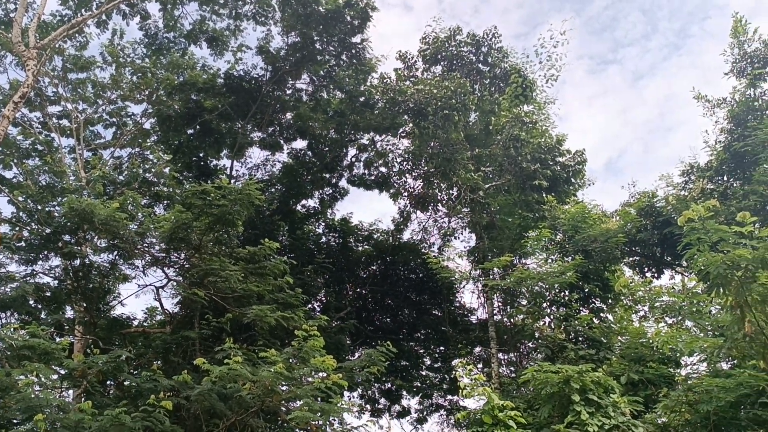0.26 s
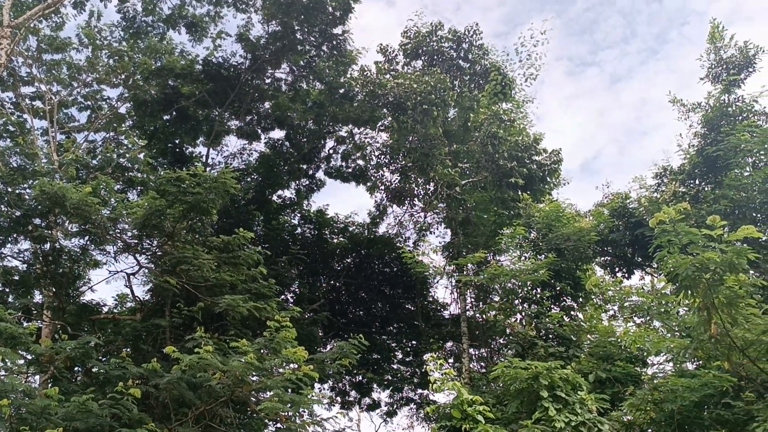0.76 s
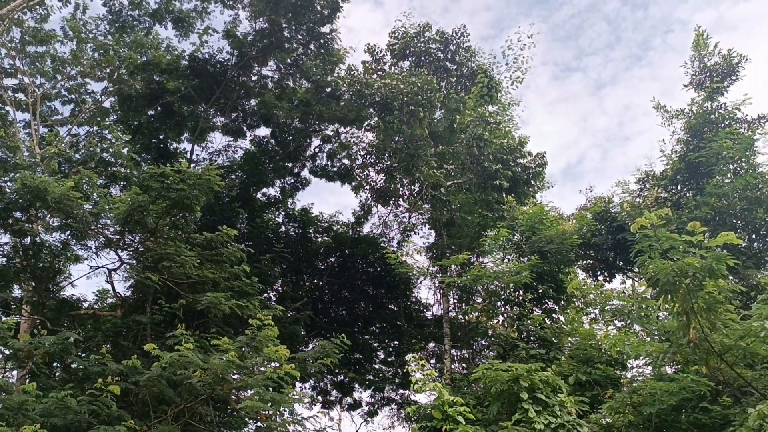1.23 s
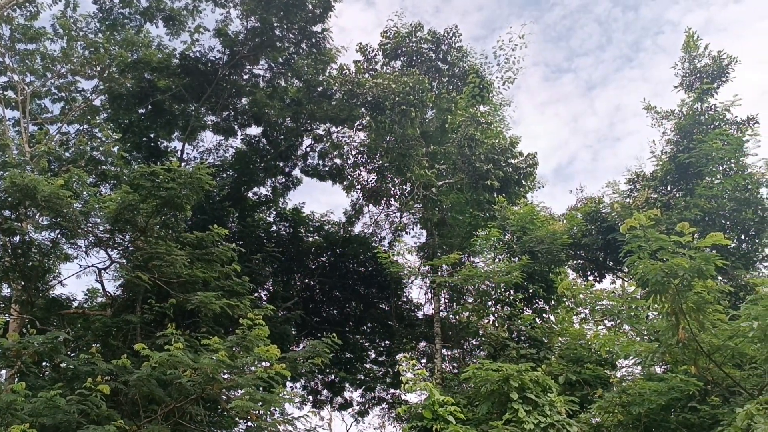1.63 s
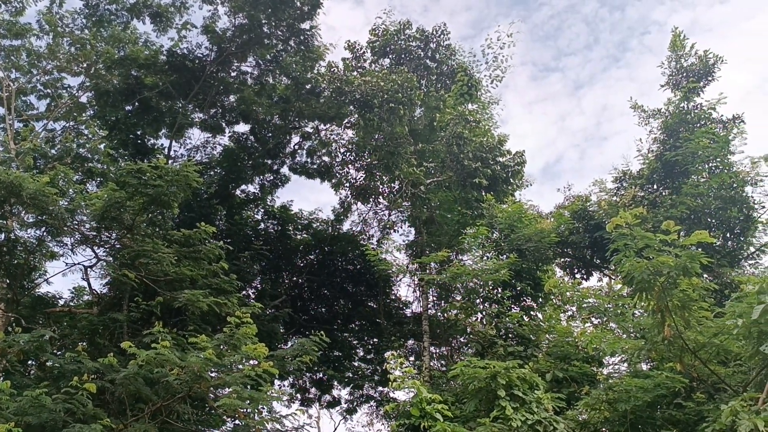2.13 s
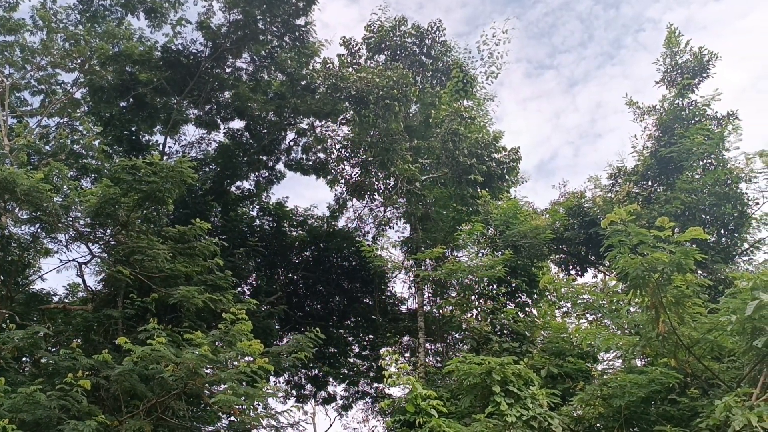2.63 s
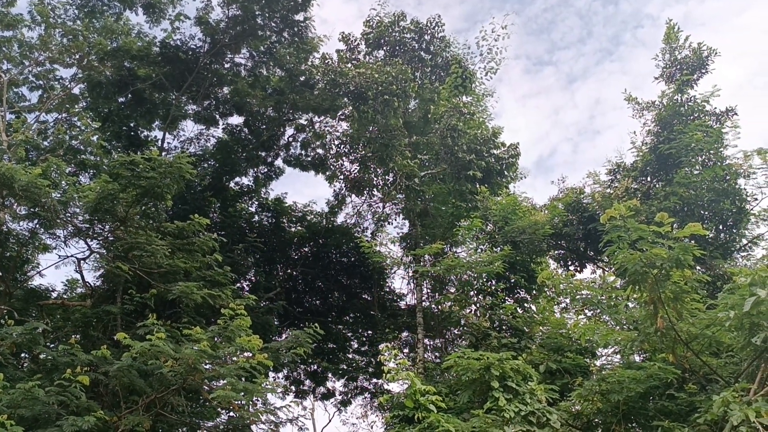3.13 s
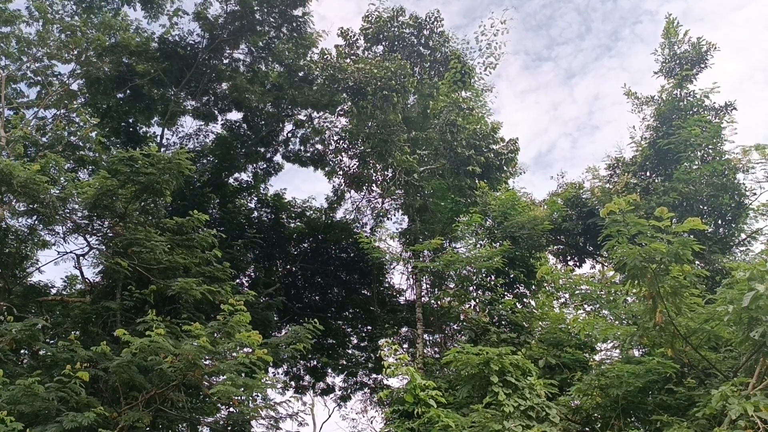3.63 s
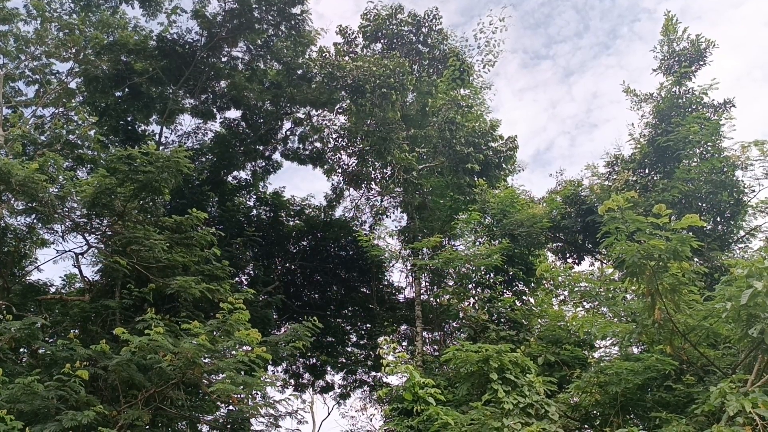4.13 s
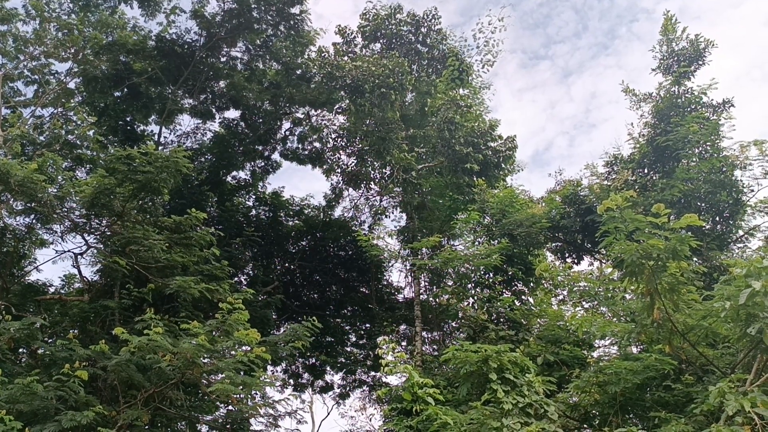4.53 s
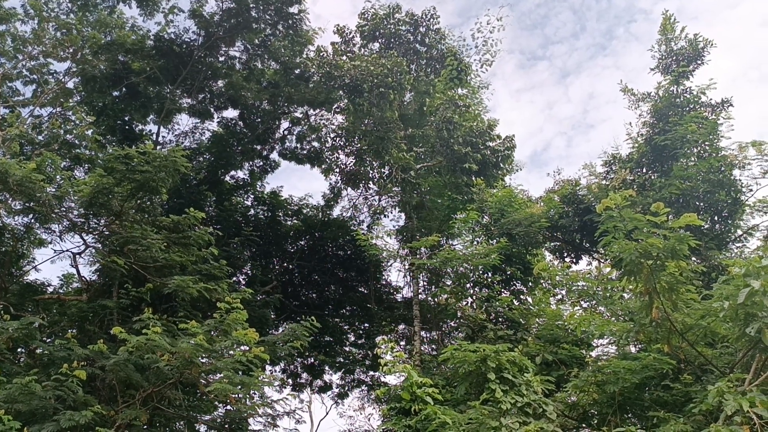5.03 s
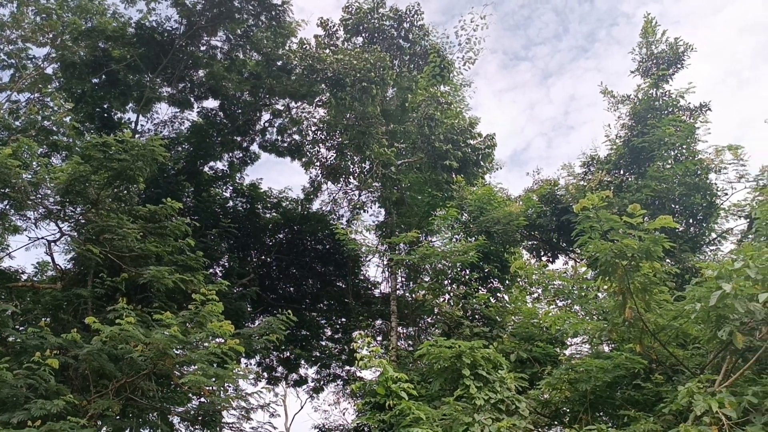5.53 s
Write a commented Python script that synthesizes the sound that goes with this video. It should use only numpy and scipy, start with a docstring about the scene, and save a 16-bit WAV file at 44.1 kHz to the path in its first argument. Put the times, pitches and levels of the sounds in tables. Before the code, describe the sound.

A high, ringing cicada drone runs throughout, toward the right, while smaller insects hiss faintly in waves on the left above a soft forest hush and low rumble. At about 0.4 seconds a large bird in the canopy starts giving short, harsh, raspy calls, two or three a second, quiet at first and steadily louder. From 1.5 seconds quick clucks fall between them, and some notes turn briefly clear or break in pitch. The calling is loudest from about 2 to 4 seconds, ending in higher clucks. A second, higher bird adds two squeals at about 3.7 and 4.1 seconds. The trees scatter the calls into a short echo. From 4.5 to 5.7 seconds a third bird gives four faint, harsh calls far away. Three very soft, dull bumps occur at about 0.4, 5.2 and 5.6 seconds.

```python
"""A chachalaca calls from the forest canopy in harsh phrases that grow louder, some notes turning clear.
Its syrinx is a harmonic source, chopped into puffs when pressed and filtered by throat and beak.
A second, higher bird joins the last phrase, then a third calls far off; the trees scatter the calls back.
Cicadas drone with ringing tymbals on the right and smaller insects hiss in waves on the left,
over a faint low rumble and three soft bumps."""
import sys
import numpy as np
from scipy import signal
from scipy.fft import rfft, irfft, next_fast_len
from scipy.io import wavfile
from scipy.ndimage import uniform_filter1d

SR = 44100
rng = np.random.default_rng(int(sys.argv[2]) if len(sys.argv) > 2 else 0)


def master(y):
    """Save y as 16-bit WAV."""
    cut = np.clip(np.atleast_2d(y).T, -1, 1)
    pcm = np.round(cut * 32767)  # scale
    wavfile.write(sys.argv[1], SR, pcm.astype(np.int16))


N = 254016
TIME = np.arange(N) / SR

# throat resonances of the near and the far bird: f/Hz, level/dB
THROAT_RESONANCES = [(130, -69), (280, -18), (520, -15), (610, -11), (780, -2.5), (900, -8), (1090, 6),
                     (1260, -2.5), (1430, -6.5), (1750, -28), (2500, -37)]
# spectral envelope of their overtones: f/Hz, level/dB
OVERTONE_ENVELOPE = [(1600, -3.5), (1870, -2.5), (1990, 2.5), (2170, 1.5), (2330, -11), (2480, 7),
                     (2730, 9), (3050, -1), (3650, -4), (4130, -5), (5000, -10), (6500, -21), (8500, -34),
                     (14000, -42)]


def gain_of(db):
    """Amplitude ratio of a level in decibels."""
    return 10 ** (np.asarray(db) / 20)


def unit_rms(x):
    """Normalisation to a mean power of 1."""
    return x / np.sqrt(np.mean(x ** 2) + 1e-20)


def value_at(points, hz):
    """Interpolation on a logarithmic frequency axis."""
    f, value = np.transpose(points)
    return np.interp(np.log(hz + 1), np.log(f + 1), value)


def band_gain(points, hz):
    """Band-pass response: beyond its ends the spectrum falls by 50 dB per octave."""
    octaves_below = np.maximum(np.log2(points[0][0] / (hz + 1)), 0)
    octaves_above = np.maximum(np.log2((hz + 1) / points[-1][0]), 0)
    return gain_of(value_at(points, hz) - 50 * (octaves_below + octaves_above))


def coloured(x, points):
    """Linear filtering by multiplication of spectra; the result has rms 1."""
    n = next_fast_len(x.shape[-1])
    response = band_gain(points, np.fft.rfftfreq(n, 1 / SR))
    return unit_rms(irfft(rfft(x, n) * response, n)[..., :x.shape[-1]])


def wander(n, hz):
    """Random modulation: up to a second of noise, low-passed near hz, with rms about 1."""
    low_pass = np.exp(-(np.arange(SR // 2 + 1) / hz) ** 2)
    return unit_rms(irfft(rfft(rng.standard_normal(SR)) * low_pass, SR))[:n]


def levelled(x, window=700):
    """Division by the short-time rms steadies the level but keeps faster pulses."""
    return x / np.sqrt(uniform_filter1d(uniform_filter1d(x ** 2, window), window) + 1e-9)


def add(mix, start, sound):
    """Superposition of a sound from a start time in seconds."""
    part = mix[round(start * SR):][:len(sound)]
    part += sound[:len(part)]


def placed(x, left_db, left_lead=0):
    """Interaural differences: one of level, and one of time in samples."""
    left, right = x * gain_of([[left_db / 2], [-left_db / 2]])
    return np.array([np.roll(left, -left_lead), right])


def noise_pair(correlation):
    """Partial correlation: two channels of white noise share a component."""
    a, b = rng.standard_normal((2, N))
    return np.array([a, correlation * a + np.sqrt(1 - correlation ** 2) * b])


def background(db=-51):
    """Distant rumble and diffuse forest hush: coherence between the ears falls with frequency."""
    # spectral density of the hush: f/Hz, level/dB
    hush_spectrum = [(20, -34), (45, -15.5), (65, -1.5), (85, -3.5), (108, 4), (150, -5), (300, -8.5),
                     (600, -14), (900, -16), (1150, -15), (1700, -16.5), (2700, -11.5), (3300, -11),
                     (4300, -8.5), (7200, -15), (8300, -31), (16000, -47)]
    hz = np.fft.rfftfreq(N, 1 / SR)
    coherence = value_at([(100, 0.59), (500, 0.17), (2000, 0.025)], hz)
    left_db = value_at([(600, 1.5), (1200, -1.5), (4200, -6.5), (7000, 5.5), (9000, -6.5)], hz)
    left, independent = rfft(rng.standard_normal((2, N)))
    right = coherence * left + np.sqrt(1 - coherence ** 2) * independent
    pair = irfft(np.array([left * gain_of(left_db / 2), right * gain_of(-left_db / 2)]), N)
    return gain_of(db) * coloured(pair, hush_spectrum)


def bumps():
    """Damped oscillation: each dull knock is a sine and a noisy scuff that die away together."""
    # soft knocks: t/s, level/dB, f/Hz, decay time/s
    knocks = [(0.352, -60.5, 590, 0.0044), (5.223, -54.5, 213, 0.0057), (5.558, -48.5, 107, 0.0068)]
    track, t = np.zeros(N), np.arange(SR // 4) / SR
    for start, db, hz, decay in knocks:
        scuff = coloured(rng.standard_normal(len(t)), [(hz / 2, -8), (hz, 0), (hz * 2, -6), (hz * 6, -22)])
        envelope = gain_of(db) * t / decay * np.exp(1 - t / decay)
        add(track, start, envelope * (np.sin(2 * np.pi * hz * t) + scuff))
    return track


def insect_swell_db(build_s=0.35, stop_s=0.077, rest_db=-64.5):
    """Incoherent sources add in power: waves build slowly and stop quickly over a resting level."""
    # crests of the waves: t/s, relative level/dB
    crests = [(0.328, -58), (1.02, -63), (1.8, -60), (2.34, -63), (2.6, -58.5), (2.95, -63), (3.349, -56.5),
              (3.75, -58), (4.2, -59), (4.48, -65), (4.98, -61), (5.2, -63), (5.76, -65)]
    waves = [gain_of(db) * np.exp(np.minimum((TIME - s) / build_s, (s - TIME) / stop_s)) for s, db in crests]
    return 10 * np.log10(gain_of(rest_db) ** 2 + sum(wave ** 2 for wave in waves))


def small_insects(flicker_hz=70, flicker_db=2.5):
    """Band-limited noise: a steady hiss, waves of hiss with a fast, uneven flicker, and a thin whine."""
    # spectral density of the steady hiss: f/Hz, level/dB
    hiss_spectrum = [(7500, -23), (9300, -15), (10200, -6.5), (11000, 1.5), (11700, -6.5), (12300, -11),
                     (13500, -20), (15000, -19), (15700, -7.5)]
    # spectral density of the waves: f/Hz, level/dB
    wave_spectrum = [(10500, -9), (11500, -9.5), (12200, -1), (13300, -7), (14500, -3), (15700, -6)]
    # envelope of the whine: t/s, relative level/dB
    whine_envelope = [(0, -70.5), (1.25, -61.5), (1.8, -73), (2.7, -67), (3.3, -82), (5.76, -83)]
    hiss = coloured(noise_pair(0.24), hiss_spectrum) * gain_of(-68)
    flicker_rate = flicker_hz * (1 + .3 * np.resize(wander(SR, 30.5), N))
    flicker = np.sin(2 * np.pi * np.cumsum(flicker_rate) / SR)
    waves = coloured(noise_pair(.3), wave_spectrum) * gain_of(insect_swell_db() + flicker_db * flicker - 3)
    whine = coloured(noise_pair(0.19), [(10600, -30), (11150, -8), (11700, -29)])
    whine *= gain_of(np.interp(TIME, *np.transpose(whine_envelope)) - 1)
    return placed(hiss + waves, left_db=16) + placed(whine, left_db=10)


def cicadas(db=-36, tymbal_hz=104, depth=0.11):
    """Tymbal resonance: a chorus merges into a noise band, modulated by the nearest one's steady beat."""
    # spectral density of the chorus: f/Hz, level/dB
    tymbal_spectrum = [(3000, -57), (4400, -35.5), (4700, -21.5), (4950, -10), (5150, -11.5), (5330, 0),
                       (5450, 2.5), (5620, 1.5), (5800, -9), (6000, -12.5), (6250, -16), (6550, -31.5),
                       (7300, -30), (8200, -91)]
    phase = 2 * np.pi * tymbal_hz * TIME
    beat = 1 + depth * np.array([[.5], [1]]) * (np.cos(phase) + 0.43 * np.cos(2 * phase))
    chorus = coloured(noise_pair(.3), tymbal_spectrum)
    return placed(gain_of(db) * unit_rms(chorus * beat), left_db=-7, left_lead=22)


def forest_echo(x, early_db, early_s, echoes_per_s=2500):
    """Scattering: near foliage returns a quick cloud of echoes, far trunks a long tail."""
    # reverberation of the forest: f/Hz, reverberation time/s
    reverberation_times = [(300, 1), (700, 0.88), (1100, 0.86), (2700, 0.79), (5000, 0.83), (12000, 0.43)]
    t = np.arange(SR) / SR
    echoes = rng.standard_normal((2, SR)) * (rng.random((2, SR)) < echoes_per_s / SR)
    echoes *= (t > .004) * (1 + gain_of(early_db) * np.exp(-t / early_s))
    hz, delay, spectra = signal.stft(echoes, SR, nperseg=256)
    decay = gain_of(-60 * delay / value_at(reverberation_times, hz)[:, None])
    response = signal.istft(spectra * decay, SR, nperseg=256)[1]
    response /= np.linalg.norm(response, axis=1, keepdims=True)
    return signal.fftconvolve(x[None], response, axes=1)[:, :N]


def syrinx(controls, throat, overtones, rattle_hz=140, jitter=0.0513, rasp=.65, airiness=.06):
    """Source and filter: the syrinx sings harmonics; pressed, it rattles and chops them into puffs."""
    times, *curves = np.broadcast_arrays(*controls)
    t = np.arange(times[0], times[-1], 1 / SR)
    effort_db, hz, rough, bright_db, gape = (np.interp(t, times, curve) for curve in curves)
    n, rough = len(t), np.clip(rough, 0, 1)
    cycles = np.cumsum(hz * (1 + (0.0011 + jitter * rough) * wander(n, 226))) / SR
    rattle_phase = np.cumsum(rattle_hz * (1 + 0.1817 * wander(n, 71.3))) / SR % 1
    pulses = np.exp(-rattle_phase / 0.33) - np.exp(-rattle_phase / 0.088) + 0.15
    puffs = unit_rms(pulses * gain_of(1.75 * wander(n, 94)))
    harmonics = [(k * hz, np.cos(2 * np.pi * (k * cycles + rng.random()))) for k in range(1, 25)]

    def resonate(spectrum, shift, noise_share, sharpness):
        """Tone and air noise pass resonances whose frequencies slide by the factor shift."""
        tone = levelled(sum(band_gain(spectrum, f / shift) ** sharpness * wave for f, wave in harmonics))
        air = np.interp(np.cumsum(shift), np.arange(SR), coloured(rng.standard_normal(SR), spectrum))
        blend = np.sqrt(1 - noise_share) * tone + np.sqrt(noise_share) * air
        return levelled(blend * (1 - rough + rough * puffs))

    # a half-shut beak blunts the resonances; a clear note locks onto the strongest one
    blunted = [(f, db * min(gape.mean(), 1) ** 2) for f, db in throat]
    noise_share = rasp * rough ** 2
    low = resonate(blunted, gape, noise_share, sharpness=1 + 0.97 * (1 - rough) ** 2)
    high = resonate(overtones, np.maximum(gape, 1) ** .6, airiness + noise_share, sharpness=1)
    envelope = gain_of(effort_db) * signal.windows.tukey(n, .04)
    return envelope * low, envelope * gain_of(bright_db) * high


def voice(notes, throat, overtones):
    """Superposition of one bird's notes on two tracks: throat tone and overtones."""
    tracks = np.zeros((2, N))
    for controls in notes:
        for track, sound in zip(tracks, syrinx(controls, throat, overtones)):
            add(track, controls[0][0], sound)
    return tracks


def far_call(start, length, effort_db, hz, rough=0.8, bright_db=-11):
    """Joint modulation: the level and pitch of a harsh note rise and fall together."""
    u = np.linspace(0, 1, 100)
    ends = (2 * u - 1) ** 2
    return start + u * length, effort_db - 11 * ends, hz * (1 - 0.0405 * ends), rough, bright_db, 1


def far_bird(distance_db=-40):
    """Reverberant field: only scattered sound arrives from a chachalaca deep in the trees."""
    # distant calls: t/s, length/s, relative level/dB, f/Hz
    calls = [(4.551, 0.28, -36, 381), (5.079, 0.19, -27, 377), (5.329, 0.133, -20, 390),
             (5.569, 0.17, -21.5, 397)]
    song = voice([far_call(*row) for row in calls], THROAT_RESONANCES, OVERTONE_ENVELOPE).sum(0)
    return placed(gain_of(distance_db) * forest_echo(song, early_db=14, early_s=0.027), left_db=-3)


def squeal(start, length, effort_db, hz, crest, rough, bright_db):
    """Frequency modulation: a nearly clear, level note on one arch of pitch, brightest at the top."""
    u = np.linspace(0, 1, 100)
    effort = effort_db - 11.5 * abs(2 * u - 1) ** 6
    pitch = hz * (1 - .5 * (u - crest) ** 2)
    brightness = bright_db - 24 * (2 * (u - crest)) ** 2
    return start + u * length, effort, pitch, rough, brightness, 1


def answering_bird():
    """Source and filter: a second bird squeals through higher throat resonances."""
    # squeals: t/s, length/s, relative level/dB, top f/Hz, crest/length, roughness, brightness/dB
    squeals = [(3.653, .24, -39, 561, .62, 0.18, -4), (4.053, .099, -31.5, 551.2, .4, 0.23, -5)]
    # throat resonances: f/Hz, level/dB
    throat = [(200, -48), (540, -5.5), (800, -27), (1100, 1.5), (1350, 5.5), (1650, -0.5), (1900, -5.5)]
    # spectral envelope of the overtones: f/Hz, level/dB
    overtones = [(1700, -24), (2200, -9.5), (2750, -9), (3300, 1.5), (3800, -30), (4400, -5.5), (6000, -24),
                 (12000, -42)]
    return voice([squeal(*row) for row in squeals], throat, overtones)


def cluck(start, length, attack, effort_db, hz, slide, rough, bright_db, gape):
    """A transient: the note snaps open, holds, then drops away while its pitch slides down."""
    u = np.linspace(0, 1, 100)
    onset = np.maximum(1 - u * length / attack, 0)
    effort = effort_db - 31 * onset ** 2 - 25 * u ** 3.97
    return start + u * length, effort, hz * (1 - slide * (u - .5)), rough, bright_db, gape


def drawn_call(start, length, effort_db, hz, climb, crest, rough, bright_db, gape,
               clear_at, clear_s, clarity, leap):
    """Change of vibration regime: a harsh swelling call clears briefly, then may break in pitch."""
    u = np.linspace(0, 1, 100)
    before, after = np.maximum(1 - u / crest, 0), np.maximum(u - crest, 0) / (1 - crest)
    clear_position = (u * length - clear_at) / (clear_s / 2)  # -1 to 1 across the clear part
    clear = clarity * np.exp(-clear_position ** 4)
    # where the voice clears, the throat rings louder and the overtones fall back against it
    effort = effort_db - 18 * before ** 2.47 - 16.5 * after ** 2.34 + 7 * clear
    brightness = bright_db + 0.5 * (u - .5) - 7 * clear
    pitch = hz * (1 - climb * before ** 2 - 0.048 * after ** 2) * np.where(clear_position > 1, leap, 1)
    opening_beak = gape * (1 + 0.0504 * (u - .5))
    return start + u * length, effort, pitch, rough * (1 - clear), brightness, opening_beak


def leading_bird():
    """Source and filter: drawn-out calls and short clucks excite the same throat resonances."""
    # calls: t/s, length/s, relative level/dB, f/Hz, climb/f, crest/length, roughness, brightness/dB,
    # beak factor, time to mid clear part/s, its length/s, clarity, pitch ratio of the break
    calls = [ (0.426, 0.15, -46.5, 261.3, 0.056, 0.55, .9, -29, 0.71, 0.044, 0.023, 0.2, 1.02),
             (0.931, 0.17, -40.5, 349.3, .16, .55, 0.94, -12.5, 0.91, 0.086, .02, 0.03, 0.91),
             (1.348, 0.18, -36, 371.2, .09, 0.74, 1.1, -8, 1, .04, 0.033, 0.7, 0.91),
             (1.8, 0.18, -34, 365.4, .17, 0.71, 0.83, -7.5, 1.016, 0.12, 0.022, 0.7, 0.98),
             (2.162, 0.182, -29.5, 357.3, .2, .56, 0.63, -9, 1, 0.1016, 0.098, 1, 1),
             (2.5, 0.16, -30, 377, 0.17, 0.74, 0.83, -5, 1.037, 0.097, 0.038, 0.87, 1),
             (2.913, 0.226, -24.5, 399.9, .14, .57, .75, -7, 1.07, .035, 0.04437, 0.56, 1.34),
             (3.327, 0.145, -26.5, 392, 0.22, 0.58, 0.75, -5.5, 1.07, 0.045, 0.0287, 0.8, 1),
             (3.699, 0.21, -25, 417.3, .18, 0.46, 0.7, -7.5, 1.085, .035, 0.039, 0.12, 1.31), ]
    # clucks: t/s, length/s, attack/s, relative level/dB, f/Hz, slide/f, roughness, brightness/dB,
    # beak factor
    clucks = [ (1.529, 0.071, 0.009, -35, 363.7, 0.046, 1.2, -8.5, 1),
              (1.985, 0.05, 0.019, -24, 361, 0.063, 0.54, -8.5, 1.03),
              (2.045, .045, 0.016, -28, 363, 0.057, 0.67, -10.5, 1.01),
              (2.311, 0.05, 0.0065, -37, 345.2, 0.055, 0.65, -5.5, 1.03),
              (2.674, .055, 0.0067, -25, 371, 0.051, 0.73, -6, 1.015),
              (2.754, 0.053, 0.018, -25, 365.7, 0.055, 0.46, -8, 1.07),
              (2.816, 0.05, .011, -34.5, 375.4, 0.075, 0.96, -8.5, 1.05),
              (3.472, .054, 0.0034, -23, 537, 0.22, 0.47, -4, 1.09),
              (3.548, 0.0487, 0.022, -24, 547, 0.068, 0.9, -3.5, 1.076),
              (3.608, 0.041, 0.019, -23.5, 554, .05, 0.85, -9, 1.05),
              (3.921, 0.044, 0.0089, -29.5, 626, 0.03, 0.46, -21, 1.25),
              (4.032, 0.053, 0.027, -32, 578, 0.16, 0.18, -35, 1.01), ]
    notes = [drawn_call(*row) for row in calls] + [cluck(*row) for row in clucks]
    return voice(notes, THROAT_RESONANCES, OVERTONE_ENVELOPE)


def near_birds():
    """Direct and scattered paths: throat tones arrive mostly straight, overtones largely via leaves."""
    low, high = leading_bird() + answering_bird()
    direct = gain_of(-2) * low + gain_of(-7.5) * high
    echo = gain_of(-11.5) * forest_echo(low, early_db=1, early_s=0.043)
    echo += gain_of(0.5) * forest_echo(high, early_db=10, early_s=0.02)
    return placed(direct, left_db=-1, left_lead=5) + placed(echo, left_db=-5)


def scene():
    """Superposition: the pressures of all sources add at each ear."""
    return near_birds() + far_bird() + cicadas() + small_insects() + background() + bumps()


def record(dry):
    """Band limiting: a steep low-pass filter cuts the treble above 15.8 kHz."""
    low_pass = signal.firwin(801, 15800, window=("kaiser", 9), fs=SR)
    return signal.oaconvolve(dry, low_pass[None], "same")


dry = scene()
out = record(dry)
master(out)
```